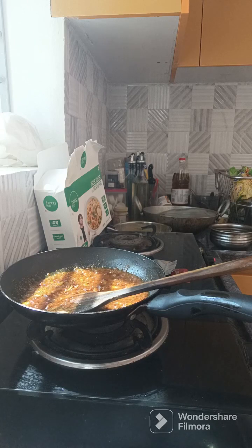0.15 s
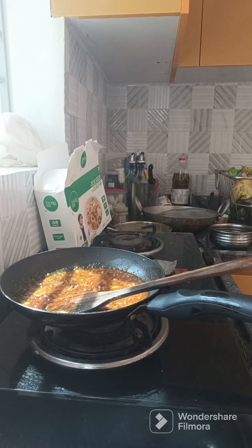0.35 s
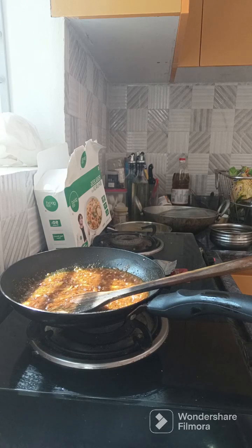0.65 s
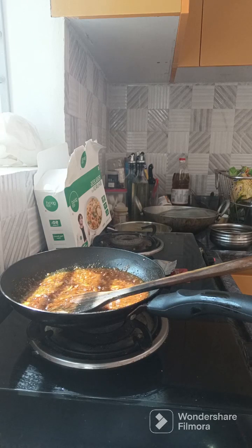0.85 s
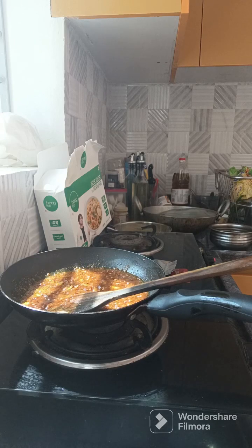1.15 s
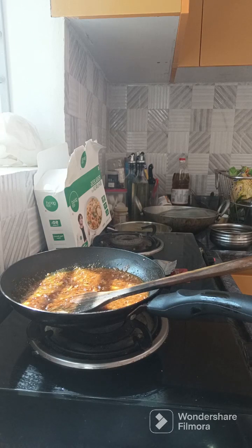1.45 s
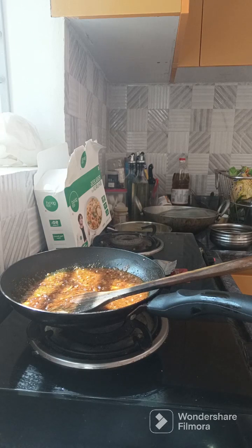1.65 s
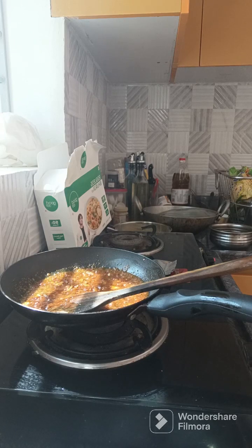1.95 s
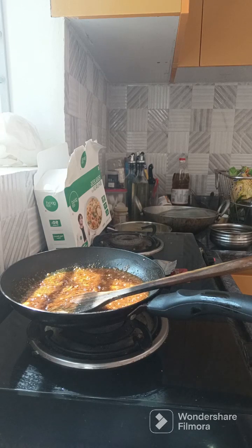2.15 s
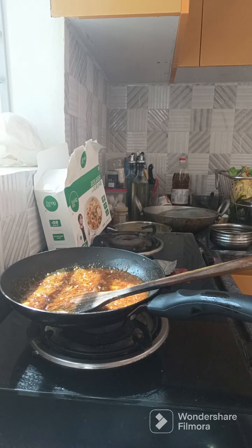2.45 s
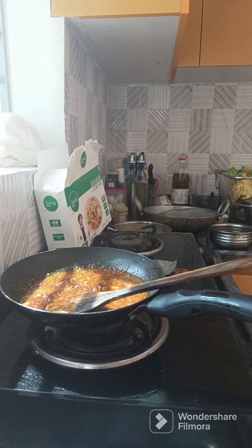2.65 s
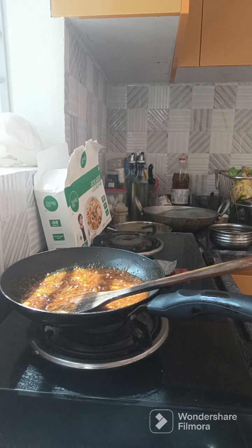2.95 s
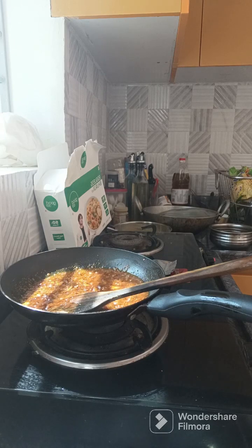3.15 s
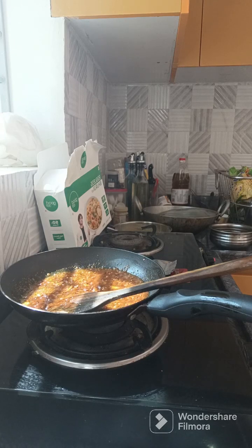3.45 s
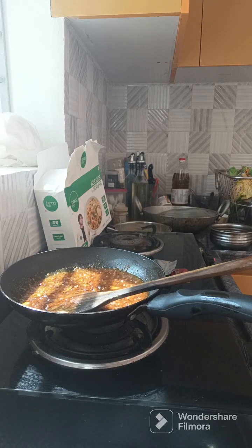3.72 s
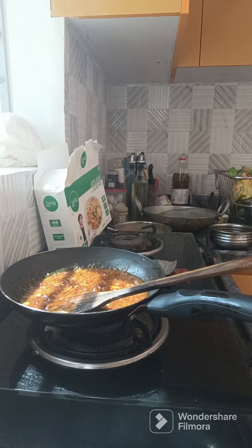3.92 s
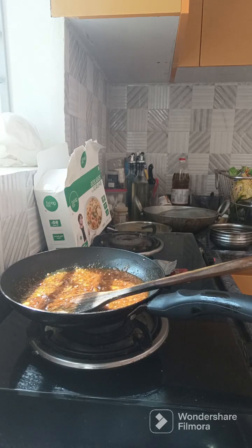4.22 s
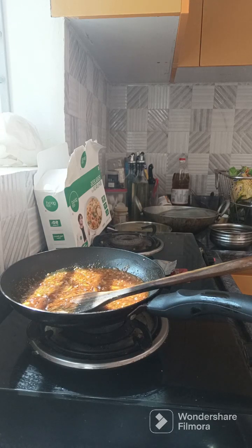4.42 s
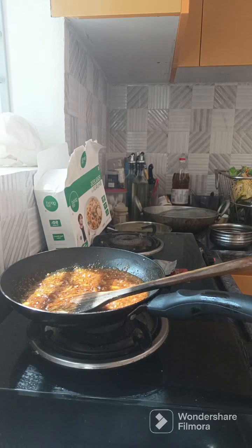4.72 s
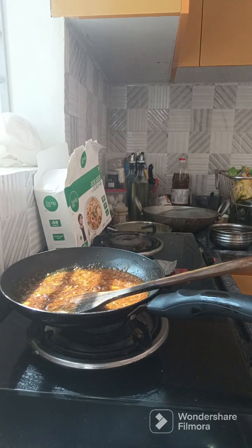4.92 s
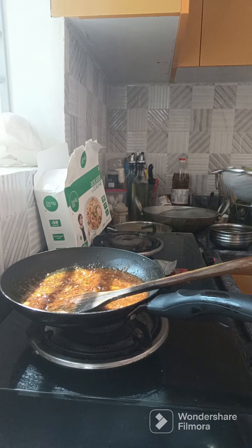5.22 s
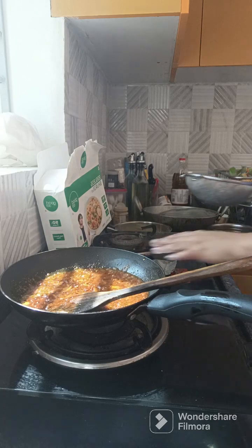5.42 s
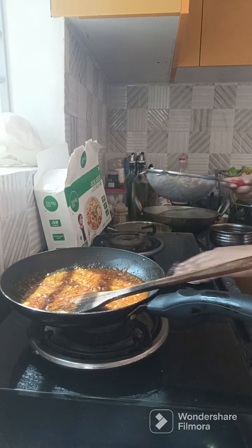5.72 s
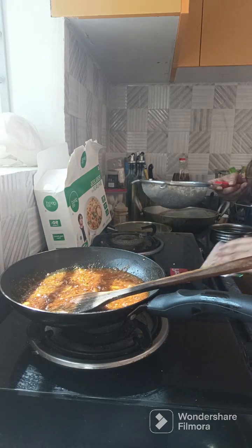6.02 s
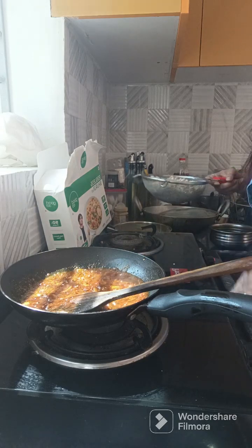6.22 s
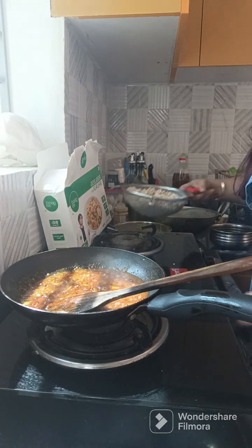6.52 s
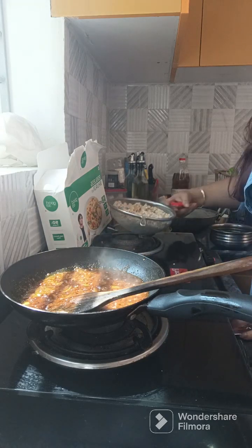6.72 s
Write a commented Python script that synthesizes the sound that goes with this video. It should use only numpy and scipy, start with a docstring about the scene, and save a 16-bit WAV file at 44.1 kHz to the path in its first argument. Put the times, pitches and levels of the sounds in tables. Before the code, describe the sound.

For nearly seven seconds onions in a watery sauce sizzle steadily in a frying pan: dense crackling bubbles, small plips around one high pitch, a fine spray of fat, and occasional sharper pops. The boil heaves slightly; a gas flame rushes very faintly beneath. At 0.3 s something slides and bumps softly on the counter. At 1.1 s a metal pot is set down with a ringing clank, rocking in quick, increasingly dull knocks until 1.4 s. From 1.9 to 2.9 s a wire sieve is shaken, ticking thinly about six times a second. At 3.4 s it brushes steel, then clashes brightly twice at 3.56 s, with a short ring and low-mid boom. A faint bump comes at 4.8 s. Small dry clicks run from 5.35 to 5.8 s, one sharp near 5.77. Muffled bumps and slides follow from 6.6 s to the end. Close stereo phone pickup, short tiled-room reverberation.

```python
"""Throughout, onions in a watery sauce sizzle in a pan over a faint gas burner in a tiled kitchen.
After a slide and a bump on the counter, a pot is set down and rocks: damped modes struck in turn.
Then a shaken wire sieve ticks as shaped noise, and clashes on steel with noise, modes and a low-mid boom.
Later a hand clicks small things about on the hob, and last come more bumps and slides.
The sizzle itself is thousands of short damped tones, one for each bursting bubble."""
import sys
import numpy as np
from scipy import signal
from scipy.fft import rfft, irfft, next_fast_len
from scipy.io import wavfile
from scipy.ndimage import uniform_filter1d, map_coordinates

SR = 44100
rng = np.random.default_rng(int(sys.argv[2]) if len(sys.argv) > 2 else 0)


def store_pcm(level_fs):
    """Save levels as 16-bit WAV."""
    pcm = np.round(np.clip(level_fs, -1, 1) * 32767).astype(np.int16)
    wavfile.write(sys.argv[1], SR, np.atleast_2d(pcm).T)


N = 302967


def amp(db):
    """Level to gain: twenty decibels are a factor of ten in amplitude."""
    return 10 ** (np.asarray(db) / 20)


def unit(x):
    """Normalization by power: scales a signal to rms 1."""
    return x / np.sqrt(np.mean(x ** 2) + 1e-20)


def along(points, hz):
    """Logarithmic frequency scale: interpolates (f, value) points on it."""
    f, v = np.transpose(points)
    return np.interp(np.log(hz + 1), np.log(f + 1), v)


def level_curve(rows):
    """Envelope: interpolates (t, level) points in time, one value per sample."""
    s, db = np.transpose(rows)
    return np.interp(np.arange(N) / SR, s, db)


def wobble(rate):
    """Slow random modulation: a smooth curve through `rate` random knots a second."""
    knots = rng.standard_normal(int(N * rate / SR) + 4)
    return map_coordinates(knots, [np.arange(N) * rate / SR])


def filtered(x, response):
    """Linear filtering: multiplies the spectrum of x by a response of frequency."""
    size = x.shape[-1]
    m = next_fast_len(size + SR // 10)
    return irfft(rfft(x, m) * response(np.fft.rfftfreq(m, 1 / SR)), m)[..., :size]


def band(x, low_hz, high_hz):
    """Band-pass filtering: steep roll-off below and above a band."""
    def response(hz):
        below = 1 + (low_hz / (hz + 1)) ** 8
        above = 1 + (hz / high_hz) ** 8
        return 1 / np.sqrt(below * above)
    return filtered(x, response)


# likeness of left and right: f/Hz, correlation [0 to 1]
LEFT_RIGHT_LIKENESS = [(40, 0.61), (80, 0.57), (160, 0.78), (270, 0.7), (450, 0.62), (740, 0.079),
                       (1220, 0.091), (2010, 0.3), (3330, 0.27), (5500, 0.2), (9000, 0.0068)]


def stereo(pair, spectrum):
    """Partial coherence: two unrelated white signals mix into a coloured left and right of rms 1."""
    def mid_side_response(hz):
        turn = np.arccos(np.clip(along(LEFT_RIGHT_LIKENESS, hz), 0, 1)) / 2
        return amp(along(spectrum, hz)) * [np.cos(turn), np.sin(turn)]
    mid, side = filtered(pair, mid_side_response)
    return unit(np.array([mid + side, mid - side]))


def noise(spectrum, size):
    """Random noise: coloured by a spectrum, in stereo, of rms 1."""
    return stereo(rng.standard_normal((2, size)), spectrum)


# how differently the two ports hear the stove: f/Hz, left minus right level/dB
PORT_DIFFERENCE = [(200, 8), (700, -4), (1100, 9), (1370, -7), (1650, 10), (2000, -5), (2450, 5),
                   (3000, -2.5), (3450, 1), (4300, -4), (5500, 0.5), (6500, -5.5), (8200, -7.5),
                   (10200, 13), (12000, 6), (15500, 8)]


def at_ports(x):
    """Level difference between receivers: each frequency leans to the left or the right port."""
    half_each = np.array([[.5], [-.5]])
    return filtered(x, lambda hz: amp(along(PORT_DIFFERENCE, hz) * half_each))


def fade(t, t60):
    """Exponential decay: falls by 60 dB in t60 seconds."""
    return np.exp(-np.log(1000) * t / max(t60, 1e-4))


def ring(modes, t):
    """Modal vibration: a sum of decaying sines, with new phases and slightly new levels for every blow."""
    total = 0
    for hz, db, t60 in modes:
        # high modes reach the two ports out of step
        phase = rng.uniform(0, 2 * np.pi) + rng.normal(0, min(hz / 1200, 2), (2, 1))
        level = amp(db + rng.normal(0, 1))
        total = total + level * fade(t, t60) * np.sin(2 * np.pi * hz * t + phase)
    return total


def add(track, s, sound):
    """Superposition: mixes a sound into the track at time s."""
    part = track[:, max(round(s * SR), 0):][:, :sound.shape[-1]]
    part += sound[..., :part.shape[-1]]


# decay of the tiled kitchen: f/Hz, T60/s
KITCHEN_DECAY = [(200, 0.11), (2000, 0.61), (6000, 0.22), (15000, 0.17)]


def kitchen(x, wet_db):
    """Reverberation: convolves x with fresh noise that decays at its own rate in each band."""
    hz, t, z = signal.stft(rng.standard_normal((2, SR // 2)), SR, nperseg=256)
    decay = 1000. ** (-t / along(KITCHEN_DECAY, hz)[:, None])
    tail = signal.istft(z * decay, SR, nperseg=256)[1]
    tail = tail / np.linalg.norm(tail[0])
    return x + amp(wet_db) * signal.fftconvolve(x, tail, axes=1)[:, :x.shape[-1]]


# spectrum of the gas flame: f/Hz, level/dB per Hz
BURNER_SPECTRUM = [(15, -54), (25, -19), (76, -10), (162, -12.5), (229, -8), (330, -16), (376, -6),
                   (498, -11.5), (618, -6.5), (779, -11), (1300, -2.5), (1690, -31), (2860, -120)]


def burner():
    """Combustion noise: the faint, steady rush of the gas flame with a slight flutter."""
    flutter_db = 1.1 * wobble(9)
    return noise(BURNER_SPECTRUM, N) * amp(-70.5 + flutter_db)


# soft bumps on the counter, and the low-mid boom and tail under the sieve's clash:
# t/s, level/dB, lowest f/Hz, highest f/Hz
LOW_BUMPS = [(0.269, -51, 500, 616), (3.42, -53.5, 91, 140), (3.564, -47.5, 664, 1200),
             (3.59, -43, 115, 300), (3.611, -42, 750, 1200), (3.69, -53, 200, 650), (4.82, -61, 190, 260),
             (5.345, -53, 350, 840), (5.375, -55, 50, 100), (6.575, -59, 700, 900), (6.802, -44, 110, 263),
             (6.853, -41.5, 330, 900)]
# things slid over the counter: t/s of the stop, level/dB, lowest f/Hz, highest f/Hz
COUNTER_SLIDES = [(0.295, -48, 149, 380), (6.60, -48.5, 151, 297), (6.69, -52, 190, 280),
                  (6.725, -48, 560, 1000), (6.79, -39.5, 300, 1050)]
# low resonances of the booms: f/Hz, level/dB per Hz
BOOM_SPECTRUM = [(45, -12), (75, -3), (112, 6.5), (155, -17), (200, -2.5), (235, 3.5), (305, -7.5),
                 (375, 0.5), (490, -19.5), (610, -0.5), (700, -10), (900, 0), (1040, -6.5), (1200, -35),
                 (2000, -40)]
# a lower bump is slower to rise; all die away alike
BUMP_RISE_CYCLES, BUMP_T60_S = 2.7, 0.26
# a slide swells until it stops, then the counter dies away
SLIDE_SWELL_DB_PER_S, SLIDE_T60_S = 420, 0.28


def bumps():
    """Forced resonance: bumps and slides on the counter, and the boom under the sieve's clash, swell low."""
    out, t = np.zeros((2, N)), np.arange(SR // 2) / SR

    def boom(low_hz, high_hz):
        """Band-limited resonance: the part of the low resonances that one contact excites."""
        return unit(band(noise(BOOM_SPECTRUM, len(t)), low_hz, high_hz))

    for s, db, low_hz, high_hz in LOW_BUMPS:
        rise = BUMP_RISE_CYCLES / np.sqrt(low_hz * high_hz)
        envelope = fade(t, BUMP_T60_S) * (1 - np.exp(-t / rise))
        add(out, s, amp(db) * boom(low_hz, high_hz) * envelope)
    stop = t.mean()
    swell = np.minimum(amp(SLIDE_SWELL_DB_PER_S * (t - stop)), fade(t - stop, SLIDE_T60_S))
    for s, db, low_hz, high_hz in COUNTER_SLIDES:
        add(out, s - stop, amp(db) * boom(low_hz, high_hz) * swell)
    return out * amp([[1.5], [-1.5]])  # stronger on the left


# small things handled on the hob: t/s, level/dB, T60/s
HOB_CLICKS = [(5.348, -27.5, 0.067), (5.356, -27, 0.02), (5.449, -32, 0.014), (5.459, -33, .012),
              (5.577, -32, .008), (5.619, -28.5, 0.022), (5.737, -33, 0.031), (5.7672, -15.5, 0.005),
              (5.774, -30, 0.021), (5.82, -31, .015)]
# spectrum of a click: f/Hz, level/dB per Hz
CLICK_SPECTRUM = [(900, -34), (1500, -4.5), (2900, -1.5), (4200, -4.5), (5500, -0.5), (8000, -11),
                  (11000, -4), (15800, -10)]


def clicks():
    """Impulsive contact: thin, fast-decaying clicks of small things on the hob, stronger on the left."""
    out, t = np.zeros((2, N)), np.arange(SR // 8) / SR
    for s, db, t60 in HOB_CLICKS:
        add(out, s, amp(db) * noise(CLICK_SPECTRUM, len(t)) * fade(t, t60))
    thin = band(out, low_hz=1570, high_hz=16000)
    return kitchen(thin * amp([[1.5], [-1.5]]), wet_db=-2)


# ticks of the shaken sieve, about six a second: t/s, level/dB
SIEVE_SHAKES = [(1.9086, -31), (2.078, -37), (2.243, -35.5), (2.408, -34), (2.578, -32), (2.740, -30),
                (2.889, -34.5)]
# spectrum of the wire: f/Hz, level/dB per Hz
WIRE_SPECTRUM = [(3000, -32), (5000, -2.5), (5700, 4), (6400, 6.5), (7300, -1), (8500, -8), (12000, -8.5),
                 (15800, -20)]
# the sieve against steel: t/s, level/dB, rise time constant/s, ring level/dB
SIEVE_CLASHES = [(3.393, -45.5, 0.0037, 1), (3.5637, -29, 0.00043, -10.5), (3.5711, -27, 0.00068, -11)]
# spectrum of the struck steel: f/Hz, level/dB per Hz
STEEL_SPECTRUM = [(700, -35), (1200, -14), (1750, -11), (2800, -12), (4150, -12.5), (4750, 2.5), (5150, -6),
                  (5580, 7.5), (6000, -10), (6350, 1), (7200, -8.5), (8900, -7), (9900, -4), (15800, -14.5)]
# ringing modes of the steel: f/Hz, level/dB, T60/s
STEEL_MODES = [(4730, -15, 0.27), (4940, -9, .3), (5610, -8, 0.51), (5740, -24, .5), (6300, -14, .4),
               (8040, -5, 0.32), (8350, -6, 0.27), (9520, -5, .3), (10200, 0, 0.28), (11550, -5, .25)]


def sieve():
    """Impact excitation: wire ticks as the sieve is shaken, then its rim brushes, clashes and rings on steel."""
    out, t = np.zeros((2, N)), np.arange(SR * 3 // 4) / SR
    lead = 0.016  # s; the load slides briefly before it strikes
    for s, db in SIEVE_SHAKES:
        strike = fade(abs(t - lead), t60=0.024)
        echo = amp(-3.5) * (t > lead) * fade(t, t60=0.36)
        add(out, s - lead, amp(db) * noise(WIRE_SPECTRUM, len(t)) * np.hypot(strike, echo))
    for s, db, rise, ring_db in SIEVE_CLASHES:
        rattle = amp(1.3 * wobble(292)[:len(t)])  # the mesh chatters against the rim
        decay = fade(t, t60=0.5) + 0.5 * fade(t, t60=0.01)
        crash = noise(STEEL_SPECTRUM, len(t)) * rattle * decay
        clash = crash + amp(ring_db) * ring(STEEL_MODES, t)
        add(out, s, amp(db) * clash * (1 - np.exp(-t / rise)))
    return at_ports(out)


# the pot is set down and rocks: t/s, level/dB, brightness as upper f/Hz
POT_KNOCKS = [(1.1317, -25.5, 4270), (1.186, -27, 3400), (1.227, -37.5, 2800), (1.266, -29, 1730),
              (1.304, -26, 446), (1.313, -38.5, 3800), (1.40, -45.5, 1100)]
# spectrum of the pot's clank: f/Hz, level/dB per Hz
POT_SPECTRUM = [(50, -50), (105, -16), (151, -26.5), (250, -13), (480, -18), (780, -10), (930, -1),
                (1060, -11), (1260, -26), (1500, -9.5), (1700, -16), (2100, -14.5), (2420, -3), (2760, -23),
                (3060, -1.5), (3300, -20), (3700, -12), (4200, -25), (6500, -15), (12000, -70)]
# ringing modes of the pot: f/Hz, level/dB, T60/s
POT_MODES = [(111.4, -6.5, 0.48), (215.7, -8.5, 0.51), (246.7, -6, 0.34), (907, 4, 0.49), (948, -4, 0.31),
             (1011, -2, 0.27), (1520, 3.6, .42), (2180, -2, .3), (2430, 2.5, 0.45), (2445, -10, 0.88),
             (2630, -2, 0.39), (3090, -3, 0.56), (3070, -11, 0.27), (3790, 0, 0.45)]
# every contact is a short clank with a longer, weaker shudder
CLANK_T60_S, SHUDDER_T60_S, SHUDDER_DB = 0.28, 0.41, -3.5
# level of the ring at the first knock; it rings less as the pot settles on the counter
RING_DB, RING_LOSS_DB_PER_S = -7.5, 48


def pot():
    """Contact damping: the first blow sets the pot ringing; as it rocks, contacts thud with less ring."""
    out, t = np.zeros((2, N)), np.arange(SR * 3 // 4) / SR
    onset = 1 - np.exp(-t / .0008)
    decay = np.hypot(fade(t, CLANK_T60_S), amp(SHUDDER_DB) * fade(t, SHUDDER_T60_S))
    first_s = POT_KNOCKS[0][0]
    for s, db, bright_hz in POT_KNOCKS:
        ring_db = RING_DB - RING_LOSS_DB_PER_S * (s - first_s)
        clank = noise(POT_SPECTRUM, len(t)) * decay + amp(ring_db) * ring(POT_MODES, t)
        add(out, s, amp(db) * band(clank * onset, low_hz=91, high_hz=bright_hz))
    return out * amp([[.3], [-.3]])  # slightly stronger on the left


# the largest bubbles bursting: t/s, relative level/dB, pitch f/Hz
LARGE_BURSTS = [(1.6728, -27, 3430), (2.5047, -31, 3420), (3.147, -31, 3400), (3.3209, -28, 3300),
                (4.4236, -28, 3430), (4.6828, -28, 3600), (5.8178, -31.5, 3430), (5.8376, -29.5, 3370),
                (6.1518, -27.5, 3240), (6.3793, -29.5, 5360)]
# spectrum of the sizzle, shared by the bursts: f/Hz, level/dB per Hz
SIZZLE_SPECTRUM = [(1000, -38), (1250, -27), (1370, -5), (1530, -9), (2020, -2.5), (2450, -2.5),
                   (2960, -6.5), (3450, 0), (3800, -4.5), (4230, -13), (5450, -3), (6200, -15.5),
                   (8400, -25), (10200, -23), (11800, -22), (15800, -31.5)]


def bursts():
    """Cavity resonance: now and then a large bubble pops with a short pitched snap."""
    out, t = np.zeros((2, N)), np.arange(SR // 20) / SR
    pop = fade(t, t60=.012) * (1 - np.exp(-t / .0003))
    for s, db, hz in LARGE_BURSTS:
        snap = np.sin(2 * np.pi * hz * t) + .4 * noise(SIZZLE_SPECTRUM, len(t))
        add(out, s, amp(db + 2.4) * pop * snap)
    return kitchen(out, wet_db=-5.0)


def bubbles(rate, low_hz, high_hz, life, spread_db, size=200):
    """Granular superposition: bubbles burst at random as short damped tones, many small and few large."""
    when, pitch, big, long = rng.random((int(rate * N / SR), 4)).T[:, :, None]
    t = np.arange(size) / SR
    tau = life * (.5 + long)
    strength = amp(-spread_db * np.log(0.027 + big)) / np.sqrt(tau)
    hz = low_hz + pitch * (high_hz - low_hz)
    grains = strength * np.exp(-t / tau) * np.sin(2 * np.pi * hz * t)
    places = (when * N).astype(int) + np.arange(size)
    return unit(np.bincount(places.ravel(), grains.ravel(), N + size)[:N])


def patchy(pair, depth_db):
    """Spectral modulation: swarms of like-sized bubbles come and go, each louder in its own band."""
    z = signal.stft(pair, nperseg=512)[2]
    field = rng.standard_normal(z.shape[1:])
    field = uniform_filter1d(field, size=4, axis=0)  # across frequency
    field = uniform_filter1d(field, size=11, axis=1)  # across time
    return signal.istft(z * amp(depth_db * unit(field)), nperseg=512)[1][:, :N]


# how hard the sauce boils: t/s, relative level/dB
BOIL_LEVEL = [(0.0, -45), (0.55, -45), (1.03, -45.5), (1.36, -43), (1.64, -46.5), (2.51, -46), (2.64, -45),
              (3.62, -47.5), (3.73, -44.5), (4.59, -47), (4.95, -48), (5.7, -48), (6.1, -48), (6.33, -46.5),
              (6.54, -47.5), (6.87, -46.5)]
# the fine spitting of the fat: t/s, relative level/dB
SPRAY_LEVEL = [(0.0, -54), (1.84, -55.5), (2.43, -54.5), (5.05, -57), (5.63, -53.5), (5.81, -54.5),
               (6.87, -57.5)]
# the boil heaves at random as steam gathers and escapes: random knots a second, depth
HEAVE_PER_S, HEAVE_DB = 11, 0.75


def sizzle():
    """Bubble acoustics: sauce bubbles crackle and plip in the heaving pan under a denser, finer spray of fat."""
    coarse = np.array([bubbles(rate=1700, low_hz=1243, high_hz=6794, life=0.00069, spread_db=3.5)
                       for _ in range(2)])
    fine = np.array([bubbles(rate=4000, low_hz=5450, high_hz=15700, life=0.00021, spread_db=0.0)
                     for _ in range(2)])
    # power share of the crackle; the spray takes the rest
    share = lambda hz: 1 / (1 + (hz / 6500) ** 8)
    swarms = patchy(kitchen(coarse, wet_db=-1.5), depth_db=2.5)
    crackle = unit(filtered(stereo(swarms, SIZZLE_SPECTRUM), lambda hz: np.sqrt(share(hz))))
    spitting = kitchen(fine, wet_db=-9.0)
    spray = unit(filtered(stereo(spitting, SIZZLE_SPECTRUM), lambda hz: np.sqrt(1 - share(hz))))
    # the commonest large bubbles share nearly one pitch and reach both ports directly
    plips = bubbles(rate=110, low_hz=3150, high_hz=3700, life=.0012, spread_db=4.5, size=400)
    heave_db = HEAVE_DB * wobble(HEAVE_PER_S)
    flurry_db = .8 * wobble(35)
    sauce_db = level_curve(BOIL_LEVEL) + heave_db + flurry_db
    sauce = (amp(2.5) * crackle + amp(-8.0) * plips) * amp(sauce_db)
    spray_db = level_curve(SPRAY_LEVEL) + 5.0 + 0.21 * wobble(9) + 0.93 * wobble(50)
    return at_ports(sauce + spray * amp(spray_db))


def scene():
    """Superposition of sources: everything around the stove."""
    # the sizzle is kept thin: nothing much below 1320 Hz
    low_cut = lambda hz: 1 / np.sqrt(1 + (1320 / (hz + 1)) ** 24)
    bubbling = filtered(sizzle() + bursts(), low_cut)
    return burner() + bumps() + clicks() + sieve() + pot() + bubbling


TOP_HZ = 15850


def record(dry):
    """Band limiting: the phone that listens keeps nothing above its upper limit."""
    return filtered(dry, lambda hz: hz < TOP_HZ)


dry = scene()
out = record(dry)
store_pcm(out)
```